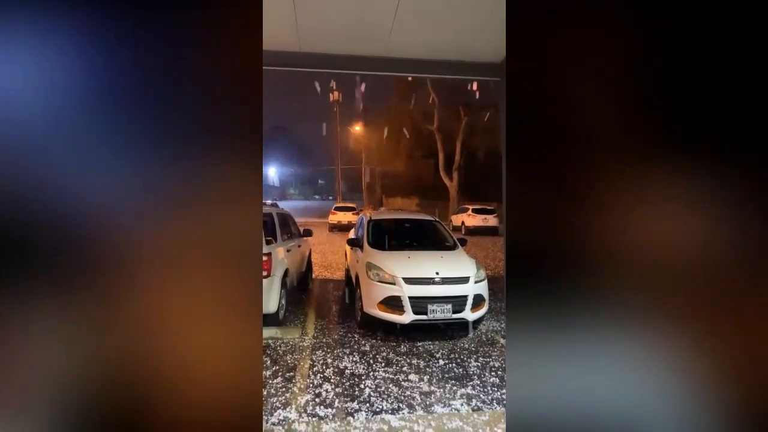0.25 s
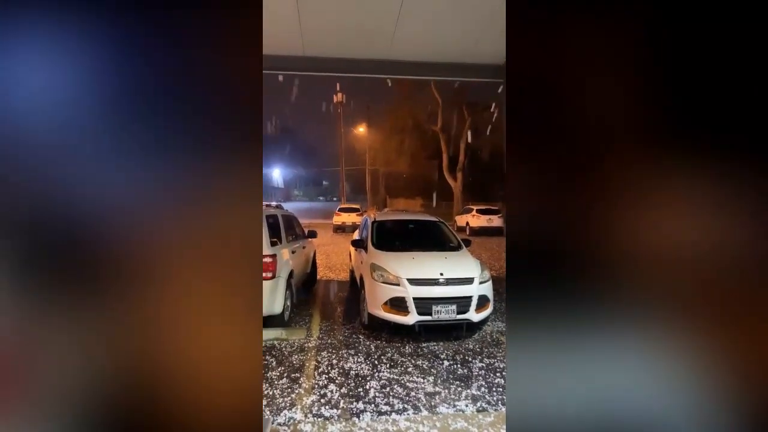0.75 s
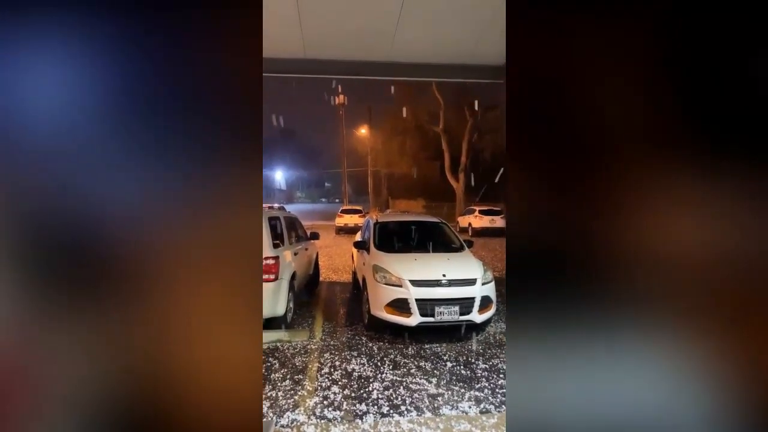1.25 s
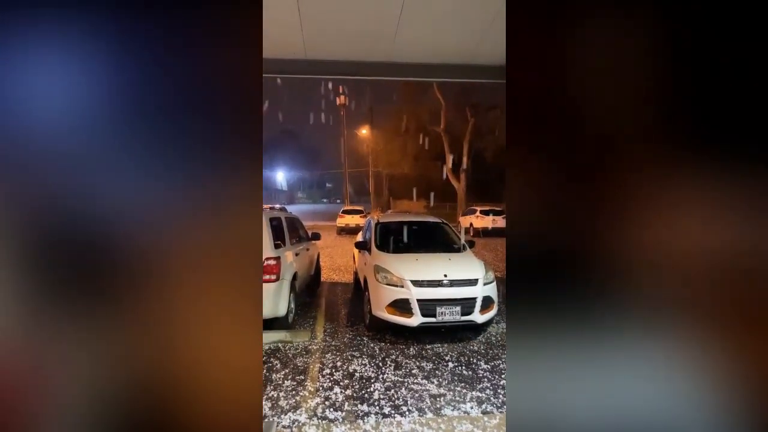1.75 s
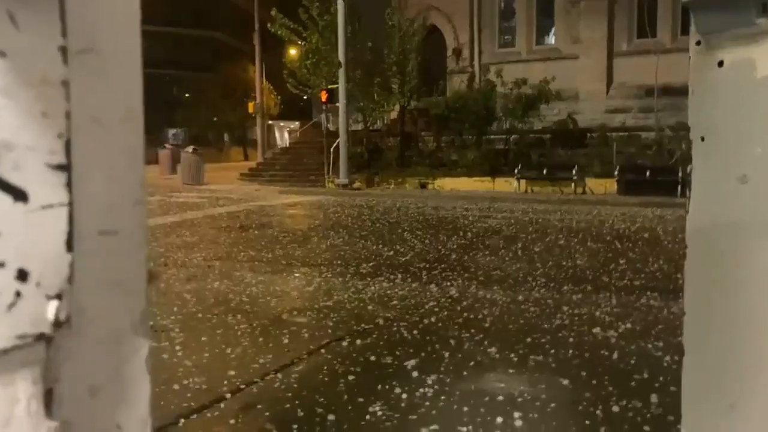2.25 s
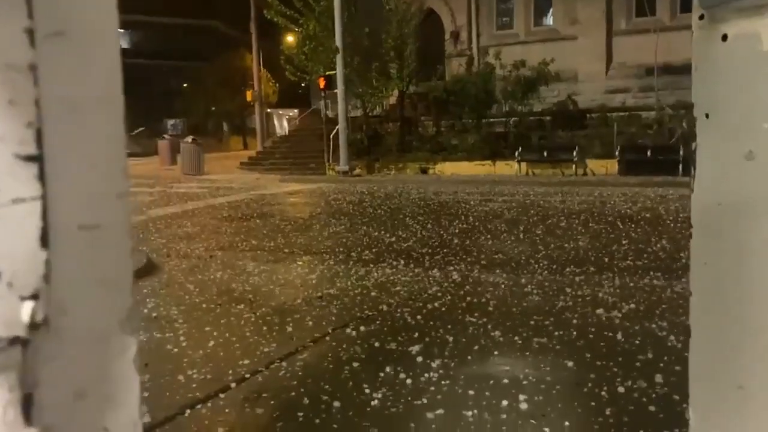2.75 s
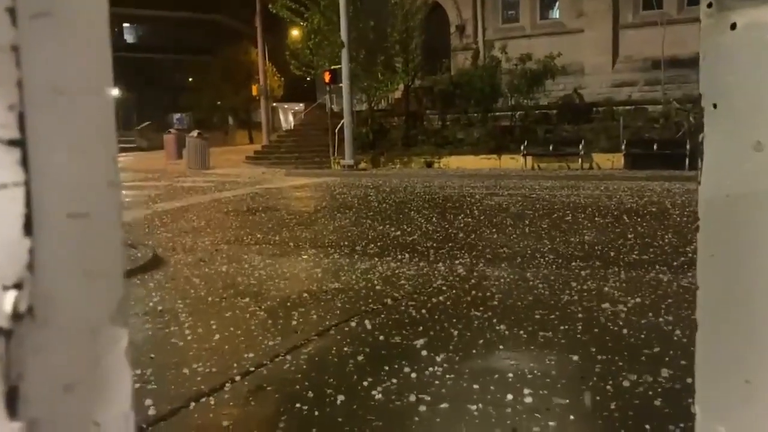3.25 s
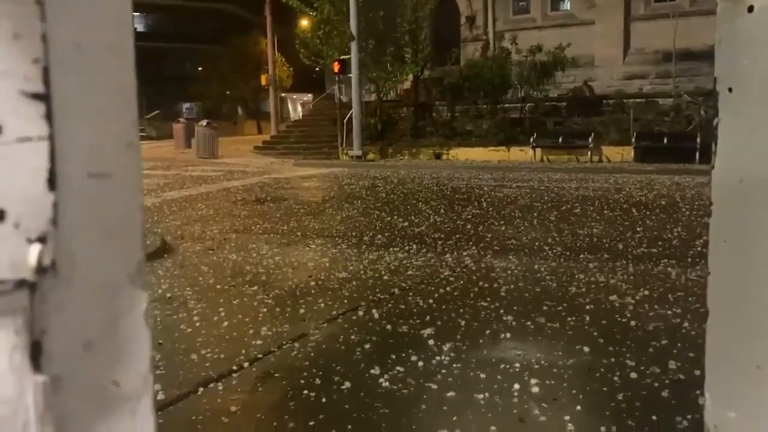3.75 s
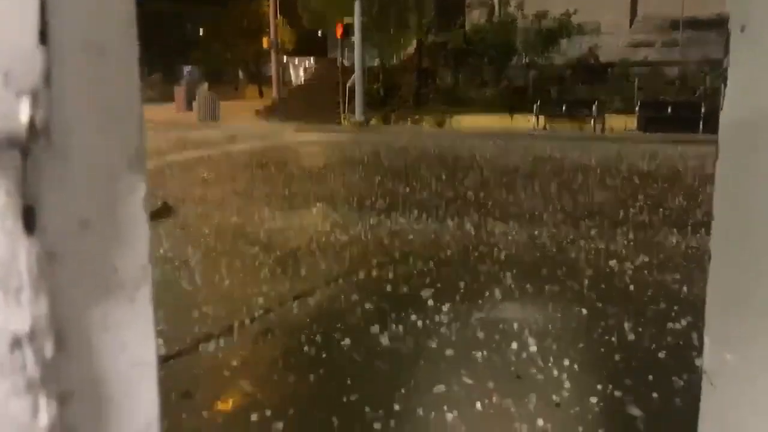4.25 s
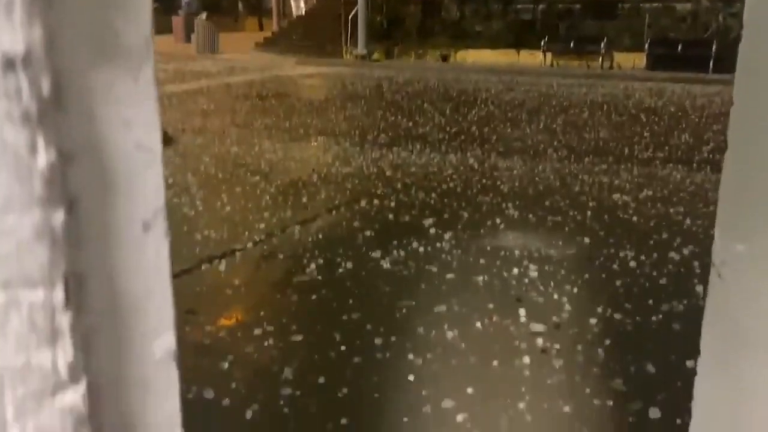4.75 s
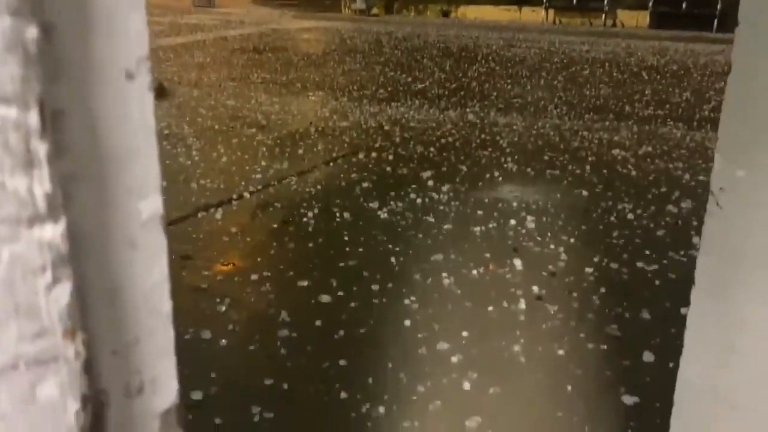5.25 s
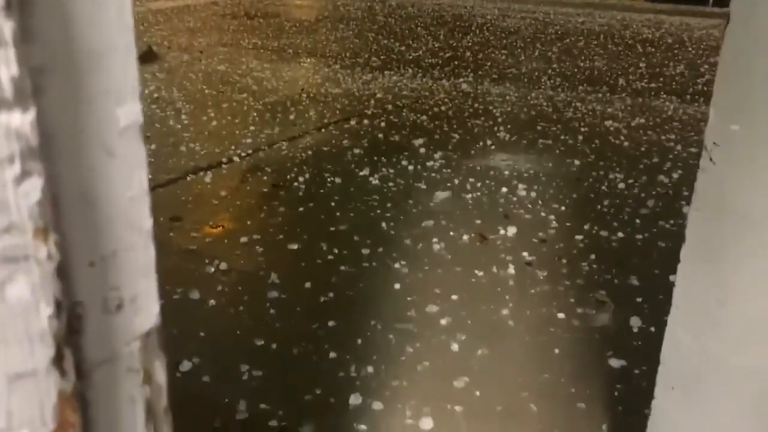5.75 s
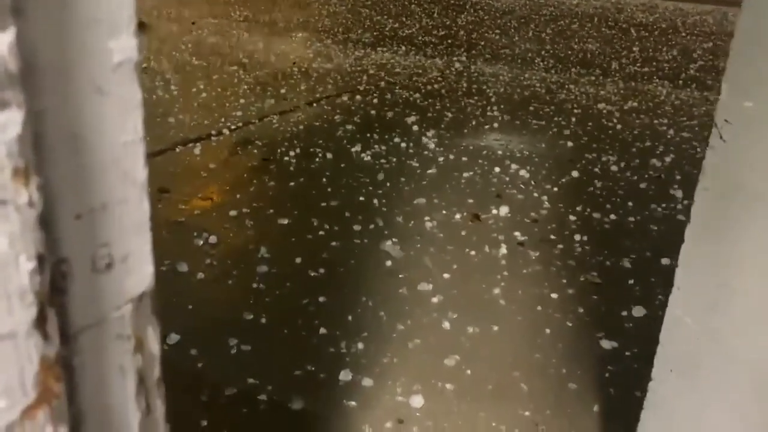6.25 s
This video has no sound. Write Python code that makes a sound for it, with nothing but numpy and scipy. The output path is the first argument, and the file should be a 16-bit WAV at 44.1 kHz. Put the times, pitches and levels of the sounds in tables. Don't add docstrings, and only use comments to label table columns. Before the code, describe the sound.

Heavy hail at night. First a loud, crowded, slightly saturated mono roar under an awning, with bright smacks overhead and hollow booms from car panels. It cuts dead for a fraction of a second, then a stereo doorway view opens: a hissing wash of hail on the street, low door thuds, woody frame knocks and sharp ice cracks close to the microphone, the level dipping after hard hits.

```python
import sys
import numpy as np
from scipy import signal
from scipy.fft import rfft, irfft
from scipy.io import wavfile
from scipy.ndimage import uniform_filter1d

SR = 44100
rng = np.random.default_rng(int(sys.argv[2]) if len(sys.argv) > 2 else 0)


def master(y):
    cut = np.clip(np.atleast_2d(y).T, -1, 1)
    pcm = np.round(cut * 32767)
    wavfile.write(sys.argv[1], SR, pcm.astype(np.int16))


def field_ratio(decibels):
    return 10 ** (np.asarray(decibels, dtype=float) / 20)


N = 286650
T = np.arange(N) / SR
HZ = np.maximum(np.arange(N // 2 + 1) * SR / N, 1)
OCTAVE_HZ = 62.5 * 2. ** np.arange(9)
STOP_S, START_S = 1.9472, 2.1035

# (time [s], drop [dB])
OVERLOADS = [(2.196, 5), (2.304, 1.5), (2.506, 3.5), (2.738, 0.5), (2.948, 2), (3.005, 1.5), (3.108, 5),
             (3.413, 7.5), (3.502, -1.5), (3.632, 1), (3.975, 2.5), (4.289, 6), (4.459, 3), (4.652, 3),
             (4.847, 5), (5.203, 2.5), (5.297, 2.5), (5.488, 0.5), (5.659, 0.5), (5.99, 5.5), (6.135, 3),
             (6.336, 5.5), (6.483, 2)]


def column(table, k):
    table = np.array(table)
    return np.interp(np.log(HZ), np.log(table[:, 0]), table[:, k])


def walk(rate):
    k = int(SR / rate)
    held = np.repeat(rng.standard_normal(N // k + 1), k)
    steps = uniform_filter1d(uniform_filter1d(held, k), k)[:N]
    return 1.6 * (steps - uniform_filter1d(steps, 4 * k))


def octave(spectrum, hz):
    distance = np.log2(np.clip(HZ, OCTAVE_HZ[0], OCTAVE_HZ[-1]) / hz)
    return spectrum * np.cos(np.pi / 2 * np.clip(distance, -1, 1))


def rings(s, size, hz, cycles):
    out = np.zeros(N + SR)
    for at, gain, f, decay in np.broadcast(s, size, hz, cycles):
        turns = np.arange(int(5 * decay * SR / f)) * f / SR
        start = int(at * SR)
        out[start:start + len(turns)] += gain * np.sin(2 * np.pi * turns) * np.exp(-turns / decay)
    return out[:N]


def pings(span, per_s, ring_s):
    length_s = span[-1] - span[0]
    when, pitch, force = rng.random((int(per_s * length_s), 3)).T
    hz = 900 + 14000 * pitch
    notes = rings(span[0] + length_s * when, field_ratio(5.0 * force), hz, ring_s * hz)
    return notes / notes[notes != 0].std()


def hail(curve, bass, treble, colour, channels, per_s, spread_db, tint_db, share, flicker_db, ping_db):
    s, fall_db = np.transpose(curve)
    level_db = np.interp(T, s, fall_db)
    swell_db = level_db - fall_db.mean()
    since = np.clip(T, s[0], s[-1]) - (s[0] + s[-1]) / 2
    low_db, high_db = (follow * swell_db + drift * since + wander * walk(6.)
                       for follow, drift, wander in (bass, treble))

    count = int(per_s * N / SR)
    where = rng.integers(20, N - 20, count)
    size = field_ratio(spread_db * np.minimum(rng.exponential(size=count), 3.5))
    gust = walk(21.987)
    views = [0] * channels
    notes = [field_ratio(ping_db) * pings(s, per_s=700., ring_s=.006) for _ in views]
    for hz in OCTAVE_HZ:
        tilt_db = low_db if hz < 400 else high_db if hz > 5000 else 0
        flicker = flicker_db * (hz / 6400.0) ** 0.32 * (gust + 1.4 * walk(40.))
        gain = field_ratio(level_db + tilt_db + flicker)
        tinted = size * field_ratio(tint_db * rng.standard_normal(count))
        part = np.clip(share * min(hz / 7900.0, 1) ** .5, 0, 1)
        for k in range(channels):
            clicks = np.zeros(N)
            shifted = where + k * rng.integers(-12, 13, count)
            np.add.at(clicks, shifted, tinted * rng.choice([-1, 1], count))
            wash = rng.standard_normal(N)
            mix = np.sqrt(part) * clicks / clicks.std() + np.sqrt(1 - part) * wash + notes[k]
            views[k] = views[k] + octave(rfft(mix * gain), hz)

    shape = field_ratio(column(colour, 1))
    middle = (HZ > 450) & (HZ < 5000)
    shape = shape / np.sqrt(np.sum(shape[middle] ** 2) / len(HZ))
    return [view * shape for view in views]


def awning_fall():
    # (time [s], level [dB])
    fall_curve = [
        (0.0, -13.5),
        (0.22, -15.5),
        (0.54, -13.5),
        (0.86, -14.5),
        (1.19, -15),
        (1.4, -13.5),
        (1.62, -15.5),
        (1.75, -13.5),
        (1.95, -13.5),
    ]
    # (frequency [Hz], density [dB per Hz])
    fall_colour = [(20, -20), (60, -7.5), (130, -6), (300, -4.5), (470, -4.5), (900, -3.5), (1250, -2),
                   (2500, -6.5), (3200, -13), (3800, -9.5), (5200, -16), (8400, -15), (12200, -21),
                   (13000, -31)]
    view, = hail(fall_curve, bass=(-.2, .3, 2.4), treble=(-.2, 0.1, 0.43), colour=fall_colour,
                 channels=1, per_s=3000., spread_db=5.0, tint_db=3.5, share=0.54, flicker_db=0.82, ping_db=-9.5)
    return irfft(view, N)


def panel_thuds():
    # (time [s], peak [dB], panel pitch [Hz])
    panel_blows = [(0.049, -14, 353), (0.154, -9.5, 136), (0.202, -2, 282), (0.224, 1, 600),
                   (0.249, -1.5, 382), (0.279, -5, 338), (0.441, -4, 384), (0.588, -13, 103),
                   (0.69, -9, 150), (0.748, -10, 290), (0.824, -11.5, 95), (0.866, -8, 280),
                   (0.914, -5.5, 546), (0.989, -15, 278), (1.03, -4, 318), (1.137, -11, 137),
                   (1.217, -8.5, 137), (1.387, -5.5, 242), (1.451, -7.5, 220), (1.477, -8, 136)]
    s, peak_db, hz = np.transpose(panel_blows)
    return rings(s, field_ratio(peak_db - 9.5), hz, cycles=5.6)


def awning_hits():
    # (time [s], peak [dB], ring pitch [Hz])
    near_stones = [(0.0228, 4, 2540), (0.105, 2, 2350), (0.169, 2, 1650), (0.2615, 2, 1590),
                   (0.3465, -3, 2670), (0.4637, -2, 2420), (0.5357, -1, 2720), (0.582, 2, 2070),
                   (0.85, -2, 2110), (0.922, 4, 2570), (0.9662, 5, 2280), (0.97, 3, 2780),
                   (1.021, -2, 1900), (1.0592, 6, 1970), (1.0779, 0, 1840), (1.1798, 0, 2240),
                   (1.2498, 5.5, 3010), (1.2885, -1.5, 2240), (1.3127, 1, 1720), (1.3646, -6.5, 2160),
                   (1.4486, 0, 2210), (1.7095, 4, 3090), (1.7724, 3, 2350), (1.777, 2, 2560),
                   (1.8287, 1, 2360), (1.8582, -7, 2000), (1.939, 2, 4200), (1.9435, 0, 4000)]
    s, peak_db, hz = np.transpose(near_stones)
    return rings(s - .25 / hz, field_ratio(peak_db - 2.5), hz, cycles=1.5)


def awning():
    pushed = field_ratio(.6) * (awning_fall() + panel_thuds() + awning_hits())
    return .95 * np.tanh(pushed / .95)


def port_half_lead():
    null_hz = [6600, 8450, 10150, 12100, 14000, 15600]
    return np.pi / 2 * np.interp(HZ, null_hz, np.arange(len(null_hz)))


def patchy(spectrum, weight, weak):
    strength = abs(weight) / (weak * np.clip(HZ / 11000., 0, 1.1) ** 1.8)
    out = irfft(spectrum * (strength >= 1.4), N)
    chance = uniform_filter1d(rng.random(N // 1024 + 3), 2)
    loud_frames = [int((s * SR + 398) / 1024) for s, _ in OVERLOADS]
    for low, high, kept in ((0, .7, .2), (.7, 1.05, .3), (1.05, 1.4, .55)):
        frames = chance + .15 * rng.standard_normal(len(chance)) * low < kept
        frames[loud_frames] = True
        gate = uniform_filter1d(np.repeat(1. * frames, 1024)[398:398 + N], 256)
        out += gate * irfft(spectrum * (strength >= low) * (strength < high), N)
    return out


def street():
    # (time [s], level [dB])
    fall_curve = [(2.1, -10), (2.24, -15), (2.64, -16.5), (2.9, -17.5), (3.17, -13.5), (3.3, -18.5),
                  (3.44, -13.5), (3.7, -17), (3.9, -14), (4.24, -14.5), (4.6, -17.5), (4.9, -16),
                  (5.17, -16.5), (5.35, -15), (5.75, -19), (6.1, -15), (6.3, -16), (6.5, -15.5)]
    # (frequency [Hz], density [dB per Hz])
    fall_colour = [(25, -25.5), (75, -2), (170, 1.5), (300, -4), (520, -3), (800, -4), (1250, -7.5),
                   (2500, -9), (3700, -7.5), (5500, -12.5), (10000, -16.5), (15200, -19.5), (15900, -40)]
    # (frequency [Hz], side minus mid [dB], side in step with mid [-1..1],
    # side a quarter turn from mid [-1..1])
    port_image = [(60, -25, -.42, -.3), (200, -9.5, -.63, -.5), (500, -6, -0.49, -.1),
                  (1200, -1.5, -0.094, -.17), (1700, -1.5, -0.29, -.3), (2300, -5.5, .15, .05),
                  (3300, -2, .25, 0.49), (4500, -5, .3, .33), (5800, -1.5, 0.25, .2), (6600, -11, .1, .1)]
    near, other = hail(fall_curve, bass=(-.1, .1, 0.97), treble=(-0.3, 0.41, 0.92), colour=fall_colour,
                       channels=2, per_s=2000., spread_db=4.5, tint_db=4.0, share=0.48, flicker_db=0.93,
                       ping_db=-11.)
    half_lead = port_half_lead()
    treble = half_lead > 0
    tie = np.where(treble, -.55j, column(port_image, 2) + 1j * column(port_image, 3))
    side_weight = np.where(treble, np.sin(half_lead), field_ratio(column(port_image, 1)))
    mid_weight = np.cos(half_lead)

    filled = np.sign(mid_weight) * abs(mid_weight) ** 0.28
    mid = patchy(filled * near, mid_weight, weak=.36)
    loose = np.sqrt(np.clip(1 - abs(tie) ** 2, 0, 1)) * other
    side = patchy(side_weight * (tie * near + loose), side_weight, weak=.42)

    duck_db = 0
    for at, drop_db in OVERLOADS:
        recovery = np.exp(-np.maximum(T - at, 0) / 0.11)
        duck_db = duck_db + max(drop_db, 0) * (T > at) * recovery
    return np.array([mid + side, mid - side]) * field_ratio(-2.5 - duck_db)


def door_thuds():
    # (time [s], peak [dB], door pitch [Hz])
    door_blows = [(2.123, -7, 177), (2.15, -12.5, 100), (2.642, -16.5, 92), (2.928, -17, 230),
                  (3.087, -13, 145), (3.33, -16.5, 138), (3.37, -10, 281), (3.481, -13, 173),
                  (3.95, -9.5, 190), (4.068, -10, 172), (4.155, -7.5, 164), (4.202, -5, 138),
                  (4.332, -9, 169), (4.505, -13, 190), (4.723, -12.5, 198), (4.818, -10.5, 170),
                  (4.911, -11, 192), (5.107, -14, 102.4), (5.26, -13, 100.5), (5.42, -13, 189),
                  (5.47, -7, 195), (5.52, -11, 159), (5.966, -12.5, 238)]
    s, peak_db, hz = np.transpose(door_blows)
    return rings(s, field_ratio(peak_db - 6.5), hz, cycles=4.3)


def frame_knocks():
    # (time [s], peak [dB], frame pitch [Hz])
    frame_blows = [(2.107, -13, 481), (3.148, -6.5, 725), (3.164, -18, 650), (3.349, -9, 510),
                   (3.365, -11, 796), (3.379, -7.5, 479), (3.393, -20, 550), (3.796, -19, 620),
                   (3.854, -19, 655), (4.1, -11.5, 660), (4.123, -9, 773), (4.14, -10, 500),
                   (4.165, -11, 800), (4.22, -11, 760), (4.188, -7, 620), (4.321, -12.5, 720),
                   (4.754, -11, 745), (4.772, -11, 620), (4.84, -12.5, 760), (4.799, -12, 540),
                   (4.829, -14, 488), (5.438, -10.5, 750), (5.549, -11, 550), (6.058, -10, 685),
                   (6.303, -8.5, 784)]
    s, peak_db, hz = np.transpose(frame_blows)
    return rings(s, field_ratio(peak_db - 6.5), hz, cycles=6.9)


def paving_stones():
    # (time [s], peak [dB])
    middling = [(2.196, -0.5), (2.4223, -3), (2.4735, -1), (2.56, -3), (2.59, -4.5), (2.816, -0.5),
                (2.8658, -2.5), (2.9116, -1), (3.096, 0.5), (3.1068, -1.5), (3.265, -9), (3.4115, -4.5),
                (3.6317, -7.5), (3.726, 4), (3.9733, -2), (4.1897, -1.5), (4.2365, 1), (4.2409, -3.5),
                (4.2639, -1.5), (4.3198, -2), (4.5744, -2.5), (4.9093, -0.5), (5.1527, 1), (5.2965, -1),
                (5.4594, -1), (5.6063, 0.5), (5.9299, 3), (5.9583, -1), (6.2313, 0), (6.4805, -3)]
    middling_s, middling_db = np.transpose(middling)
    length_s = N / SR - START_S
    when, force = rng.random((int(10 * length_s), 2)).T
    s = np.append(middling_s, START_S + length_s * when)
    peak_db = np.append(middling_db, -8 + 2.5 * (2 * force - 1))
    pitch, direction = rng.standard_normal((len(s), 2)).T
    return np.array([s, peak_db, 4260 * np.exp(0.19 * pitch), 3 + 8 * direction])


def ice_cracks():
    # (time [s], peak [dB], ring pitch [Hz], left minus right [dB])
    big_stones = [(2.189, -0.5, 4230, -3.5), (2.3, 4, 4200, -3), (2.3482, 0, 4780, 1.5),
                  (2.5026, 1, 4280, 3), (2.6941, 1, 4920, -1.5), (2.9468, 2.5, 4500, 0),
                  (3.001, 1.5, 6200, -8), (3.0795, -2, 4280, -10.5), (3.2558, -2, 4110, 9),
                  (3.383, -3, 4360, 3.5), (3.5026, 0, 4000, -4), (3.8994, -3, 3860, -1),
                  (4.016, 1, 4890, 8), (4.2872, 2.5, 4600, 4), (4.4443, -2, 3290, 3), (4.4582, 0, 3750, 4),
                  (4.6434, -0.5, 3670, 5.5), (4.6502, 2, 3800, 5), (4.8448, 2, 3940, 7),
                  (4.978, -1.5, 4370, 8), (5.399, -0.5, 5930, -0.5), (5.6578, 2.5, 5460, 3),
                  (5.6688, -1, 4900, 0), (5.7756, 3.5, 5200, 4), (5.816, -1.5, 3320, 11),
                  (5.9156, 2, 5360, -6), (6.1332, 0, 5040, 7), (6.1967, 2.5, 5550, 10),
                  (6.3309, 1, 5000, 2.5), (6.3385, 1, 4860, 1.5)]
    s, peak_db, hz, pan_db = np.hstack([np.transpose(big_stones), paving_stones()])
    half_lead = port_half_lead()
    ports = []
    for sign in (1, -1):
        size = -field_ratio(peak_db + sign * pan_db / 2)
        ring = rings(s - 0.21 / hz, size, hz, cycles=1.32)
        split = rings(s - .0001, size * field_ratio(-6.5), 2.1 * hz, cycles=3.1)
        splinters = rings(s + .0009, size * field_ratio(-10.0), 1.5 * hz, cycles=2.3)
        lag = np.exp(-1j * sign * half_lead)
        ports.append(irfft(rfft(ring + split + splinters) * lag, N))
    return np.array(ports)


def doorway():
    return street() + door_thuds() + frame_knocks() + ice_cracks()


def scene():
    fade_in = np.clip((T - START_S) / .003, 0, 1)
    return awning() * (T < STOP_S) + doorway() * fade_in


def roll_off(x):
    return signal.sosfilt(signal.butter(12, 15770, fs=SR, output="sos"), x)


def record(dry):
    low_cut = signal.butter(2, 18, "high", fs=SR, output="sos")
    heard = signal.sosfilt(low_cut, dry)
    return roll_off(np.clip(heard, -.93, .93) * (dry != 0))


dry = scene()
out = record(dry)
master(out)
```